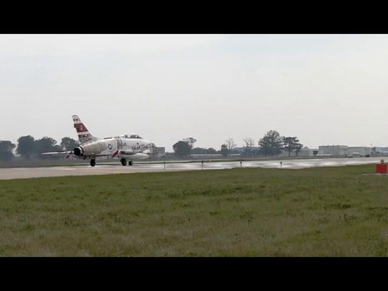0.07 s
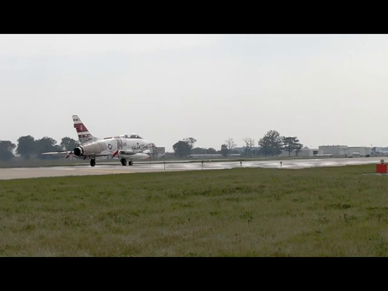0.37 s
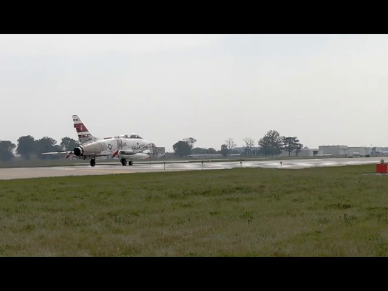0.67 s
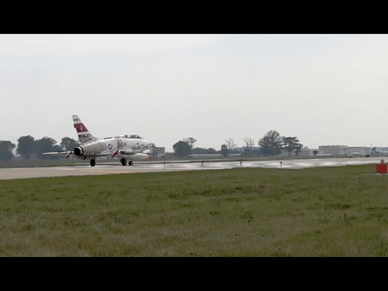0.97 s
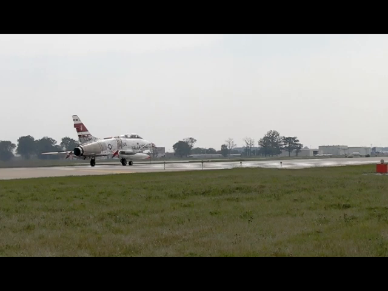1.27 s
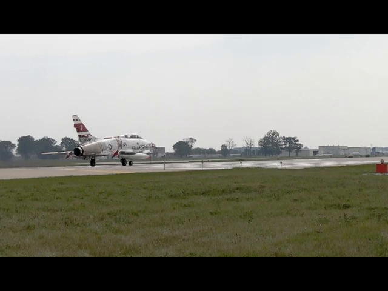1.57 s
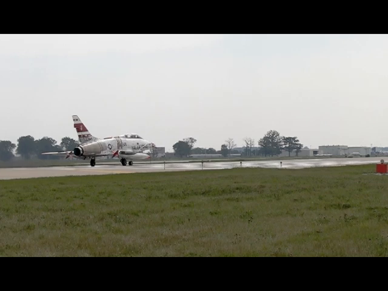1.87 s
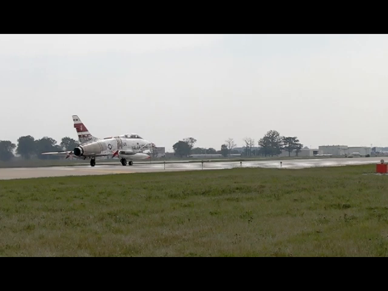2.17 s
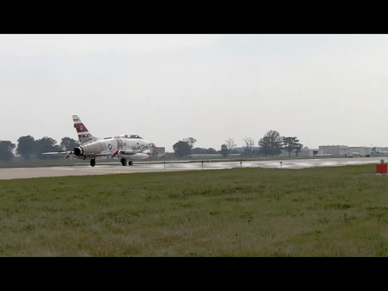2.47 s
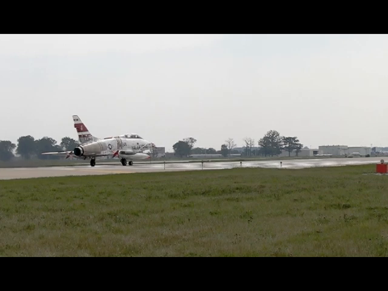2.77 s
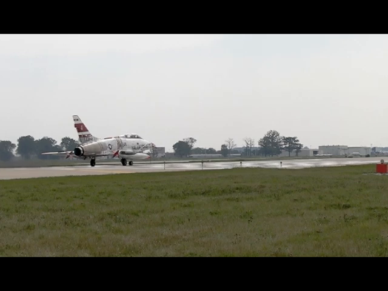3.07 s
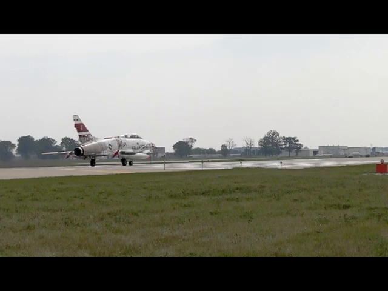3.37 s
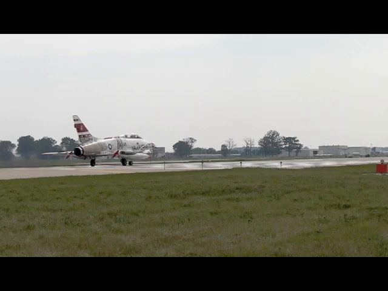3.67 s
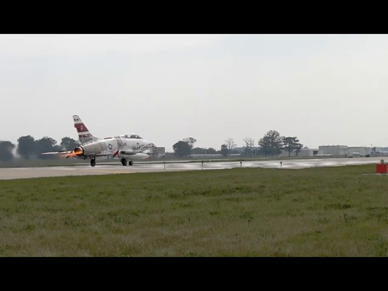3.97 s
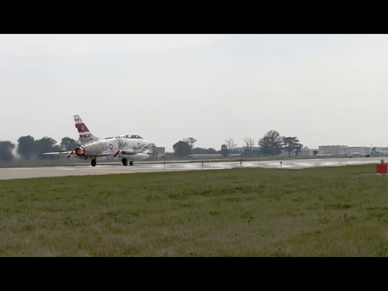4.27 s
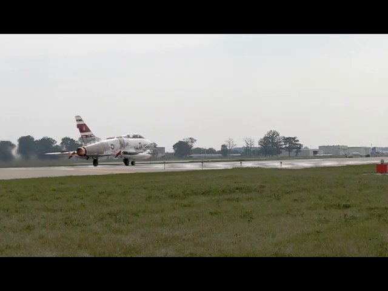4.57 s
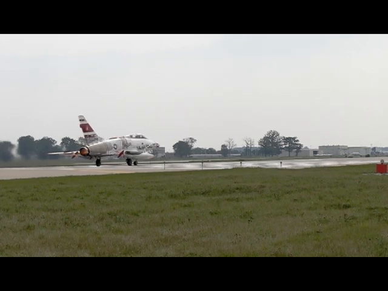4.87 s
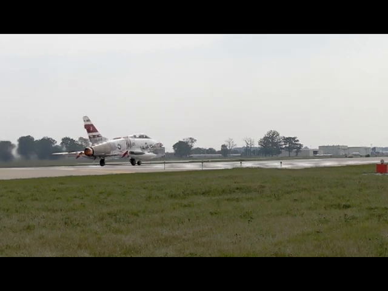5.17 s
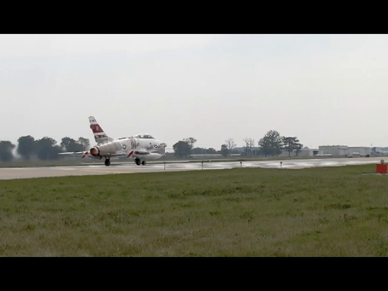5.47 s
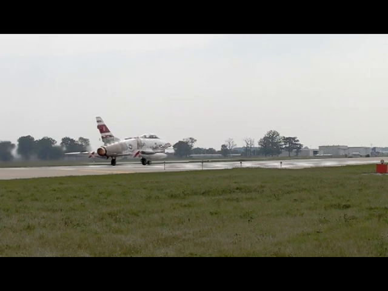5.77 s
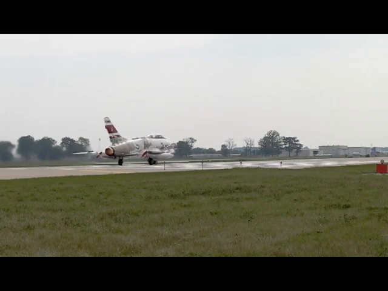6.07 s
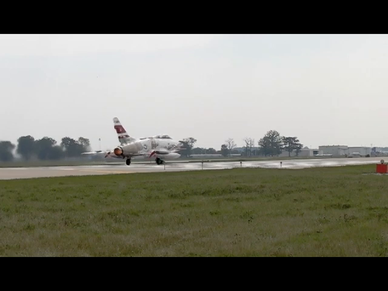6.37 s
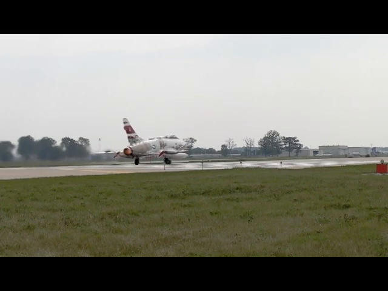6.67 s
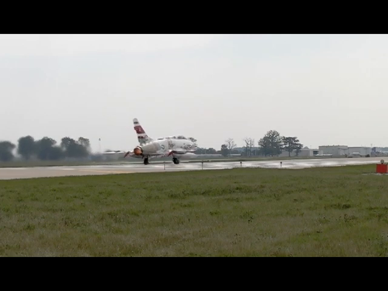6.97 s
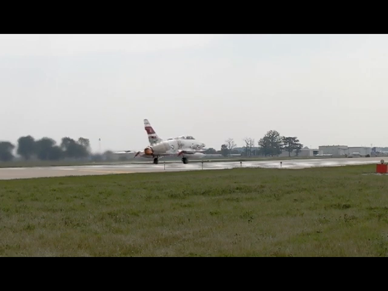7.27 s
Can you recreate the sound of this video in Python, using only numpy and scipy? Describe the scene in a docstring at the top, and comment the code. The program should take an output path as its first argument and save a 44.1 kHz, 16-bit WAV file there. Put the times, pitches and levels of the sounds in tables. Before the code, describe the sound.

Outdoors by a runway, the loud exhaust of a fighter jet rumbles, rasps and crackles in stereo. The rasp and crackle suddenly fall away, leaving a muffled rumble and a faint rush. A sharp, stuttering thud from the afterburner swamps the microphone for an instant, and the full roar is back at once. It carries on with scattered cracks and brief swells of turbine hiss, receding very slowly.

```python
"""On the grass beside a runway, a jet fighter at full power overloads a stereo microphone.
Big swirls in its exhaust rumble and roar, small ones rasp, shock waves crackle and the turbine hisses.
The nozzle opens, so the exhaust slows and the roar sinks to a dull rumble. Then the afterburner lights
with a triple thud, and the roar returns and slowly recedes as the aircraft starts to roll."""
import sys
import numpy as np
from scipy import signal
from scipy.fft import rfft, irfft, next_fast_len
from scipy.io import wavfile
from scipy.ndimage import uniform_filter1d

SR = 44100
rng = np.random.default_rng(int(sys.argv[2]) if len(sys.argv) > 2 else 0)


def wav_out(sig):
    """Save sig, one row per channel (or a flat mono array), as 16-bit PCM at SR to the path in sys.argv[1]."""
    wavfile.write(sys.argv[1], SR, np.round(np.clip(np.atleast_2d(sig).T, -1, 1) * 32767).astype(np.int16))


N = 332514
FFT_SIZE = next_fast_len(N, True)
TIME, HZ = np.arange(N) / SR, np.maximum(np.fft.rfftfreq(FFT_SIZE, 1 / SR), 1)
NOZZLE_OPENS_S, AFTERBURNER_S = 3.406, 4.118

# the strongest shock waves: (time [s], relative level [dB])
LOUD_CRACKS = [(0.281, -30), (0.3903, -15), (0.4667, -22.5), (0.5524, -25), (0.894, -25), (1.08, -17),
               (1.654, -20), (2.135, -26), (2.2082, -17), (3.322, -23), (4.1665, -16), (4.2085, -25),
               (4.647, -18), (4.751, -19), (5.0724, -15), (5.3948, -36), (5.5407, -27), (5.928, -17),
               (5.9922, -17), (6.229, -17), (6.4293, -19), (6.7257, -17), (6.795, -19), (6.969, -34),
               (7.4675, -24)]


def big_swirls(steepen_s=0.00018, squeeze=0.4, hold_s=0.017, ceiling=2.4):
    """Pressure from big swirls of exhaust: drops steepen on the way, and the largest swings are squashed."""
    # tone of the big swirls: (frequency [Hz], relative level [dB])
    spectrum = [(20, -10.5), (35, -27.5), (55, -11), (80, -7.5), (115, -2), (140, -1), (168, 0.5),
                (200, -2.5), (245, -7), (300, -6.5), (390, -9.5), (490, -18.5), (700, -12.5), (1200, -67)]
    wave = rms_one(apply_filter(rng.standard_normal((2, N)), tone(spectrum)))
    power = uniform_filter1d(wave[0] ** 2, int(hold_s * SR) + 1)
    wave = rms_one(wave / (power + 0.074) ** (squeeze / 2))
    wave = np.array([np.interp(TIME - steepen_s * w, TIME, w) for w in wave])
    return rms_one(ceiling * np.tanh(wave / ceiling))


def rumble_and_roar(pressure):
    """The deep part of the big swirls rumbles; the higher part roars."""
    deep = below(213.4)
    rumble = stereo(pressure, deep * (1 - below(20.5, order=2)))
    roar = stereo(pressure, (1 - deep) * below(490))
    return layer_gain("rumble") * rumble + layer_gain("roar") * roar


def shock_fronts(pressure, lead_s=0.0004, sputter=0.38, crack_size=2.8, crack_s=0.00098):
    """How deep the pressure plunges at each moment: shocks come in clusters and the strongest stand out."""
    smooth = apply_filter(pressure, below(420, order=4))
    plunge = -rms_one(np.interp(TIME + lead_s, TIME, smooth)) + sputter * drift(rate_hz=28)
    near_crack = np.minimum(sum(bump(s + crack_s, crack_s) for s, _ in LOUD_CRACKS), 1)
    return (1 - near_crack) * plunge + near_crack * crack_size


def rasp(plunge, flutter_db=0.5, echo_gain=0.16, echo_s=0.00283):
    """Small swirls rasp in bursts on the shocks; a close echo, shifted by the wind, ripples their tone."""
    # tone of the small swirls: (frequency [Hz], relative level [dB])
    spectrum = [(400, 11.5), (520, -4), (630, -3), (800, -9), (1050, -11.5), (1280, -11.5), (1650, -14.5),
                (2400, -21), (2800, -30.5), (3600, -35), (6000, -64)]
    noise = rng.standard_normal((2, N)) * from_db(flutter_db * drift(rate_hz=38))
    lag_s = echo_s * (1 + 0.031 * drift(rate_hz=3.5))
    gain = tone(spectrum) * (1 - below(481))
    low, out = below(917), 0
    for layer, burst_db, band in (("rasp", 2.5, low), ("tearing", 3.5, 1 - low)):
        bursts = noise * from_db(burst_db * plunge)
        echoed = [b - echo_gain * np.interp(TIME - lag_s, TIME, b) for b in bursts]
        out = out + layer_gain(layer) * stereo(echoed, gain * band)
    return out


def crackle(plunge, clicks_per_s=480, crowd_db=5, spread_db=6.0, click_db=-6.5, decay_s=0.0003):
    """Shocks crowd where the pressure plunges: uneven clicks, a sputtering fizz and a few loud cracks."""
    # tone of the shocks: (frequency [Hz], relative level [dB])
    spectrum = [(1500, -23), (3000, 7), (4200, -2), (5500, -3), (8000, -10.5), (12000, -14.5), (16000, -20)]
    level = layer_gain("crackle")
    hits = rng.random(N) < clicks_per_s / SR * rms_one(from_db(crowd_db * plunge))
    sizes = from_db(spread_db * np.clip(rng.standard_normal(N), -2, 2))
    clicks = level * from_db(click_db) * rms_one(hits * sizes)
    fizz = level * rms_one(from_db(3.0 * plunge + 3.5 * drift(rate_hz=160)))
    cracks = np.zeros(N)
    for s, level_db in LOUD_CRACKS:
        cracks[int(s * SR)] = from_db(level_db)
    cracks = signal.lfilter([1], [1, -np.exp(-1 / (decay_s * SR))], cracks + 1e-18)
    # each shock meets the two sides of the microphone in its own way
    click_pair = clicks * np.array([np.ones(N), rng.standard_normal(N)])
    pair = rng.standard_normal((2, N)) * np.hypot(fizz, cracks) - click_pair
    return np.sqrt(np.mean(level ** 2)) * stereo(pair, tone(spectrum) * (1 - below(2170)))


def layer_gain(layer):
    """A layer of exhaust sound falls as the nozzle opens, returns with the afterburner, then recedes."""
    # exhaust layers: name -> (level before the afterburner [dB], level with it [dB],
    # share of harshness [dB/dB], share of swell [dB/dB], fall as the nozzle opens [dB/s],
    # surge as the flame catches [dB], fade as the aircraft rolls away [dB/s])
    layers = {"rumble": (-13.5, -12.5, -0.06, 0, -9, 1.5, 0.5),
              "roar": (-15, -15, -0.0245, 0.19, 57, -1.5, 0.46),
              "rasp": (-23.5, -19.5, -0.09, 0, 85, 1, 0.3),
              "tearing": (-26.5, -27.6, 0.71, 0, 95, 5.5, 0.46),
              "crackle": (-42.5, -38, 0.59, 0.16, 74, 1.5, 1.47)}
    # how harsh the exhaust sounds: (time [s], treble compared with usual [dB])
    harshness = [(0.15, 0), (0.58, 6), (1.08, -3.5), (1.55, 4.5), (1.85, 1.7), (2.45, -7), (2.66, -3.5),
                 (2.95, -7.5), (3.3, -5.5), (4.55, -3.5), (5.0, 4.5), (5.55, 6.5), (5.98, -0.5), (6.7, 8.5),
                 (7.0, 4.3), (7.4, 13.5)]
    unlit_db, lit_db, harsh_share, swell_share, fall_rate, surge_db, fade_rate = layers[layer]
    unlit = unlit_db - fall_rate * np.maximum(TIME - NOZZLE_OPENS_S, 0)
    surge = surge_db * bump(AFTERBURNER_S + 0.078, width_s=0.044)
    lit = lit_db + surge - fade_rate * (TIME - AFTERBURNER_S)
    thrust_db = np.where(TIME < AFTERBURNER_S, unlit, lit)
    harsh_db = np.interp(TIME, *np.transpose(harshness))
    return from_db(thrust_db + harsh_share * harsh_db + swell_share * swell_db())


def afterburner_thuds(hold_s=0.00089, decay_s=0.00063, right_lag_s=0.00112, snap_s=0.000067):
    """Blast waves swamp the microphone: flat-topped thuds that sag away, a little later on the right."""
    # blasts as the flame catches: (time [s], push or pull [relative], snap on top [relative])
    blasts = [(4.1101, .95, .1), (4.1184, -.9, .75), (4.1264, .5, 0)]
    thuds, snaps = np.zeros((2, N)), np.zeros(N)
    for s, push, snap in blasts:
        age = TIME - s - np.array([[0], [right_lag_s]])
        thuds += push * (age > 0) * np.exp(-np.maximum(age - hold_s, 0) / decay_s)
        snaps += snap * (age[1] > 0) * np.exp(-np.abs(age[1]) / snap_s)
    thuds = signal.sosfilt(signal.butter(1, 900, fs=SR, output="sos"), thuds + 1e-18)
    snaps = signal.sosfilt(signal.butter(2, 4600, fs=SR, output="sos"), snaps + 1e-18)
    return thuds + snaps


def slow_exhaust(rumble_db, rush_db, rumble_width=0.7, rush_width=0.74):
    """With the nozzle open the exhaust is slow: a smooth rumble and a faint rush, with no shocks."""
    # tone of the slow exhaust: (frequency [Hz], relative level [dB])
    spectrum = [(20, -25), (60, -6.5), (130, 2), (180, -5), (250, -11.5), (400, -17), (540, -26.5),
                (800, -30.5), (1100, -41), (1300, -35.5), (1700, -36), (2500, -46), (4000, -68),
                (15000, -81)]
    noise = rng.standard_normal((2, N))
    low, out = below(780), 0
    for level_db, width, band in ((rumble_db, rumble_width, low), (rush_db, rush_width, 1 - low)):
        part = from_db(level_db) * stereo(noise, tone(spectrum) * band)
        out = out + width * part + (1 - width) * part.mean(axis=0)   # draw it toward the centre
    return out


def turbine(hiss_db):
    """A smooth hiss from the engine itself."""
    # tone of the turbine: (frequency [Hz], relative level [dB])
    spectrum = [(2000, -25.5), (2900, 0), (3400, 0), (4000, -7.5), (4700, -17), (8000, -47), (10500, -33),
                (16000, -45)]
    return from_db(hiss_db) * stereo(rng.standard_normal((2, N)), tone(spectrum))


def swell_db():
    """The hiss swells a few times, and the roar and crackle rise a little with it."""
    # swells of the turbine hiss: (time [s], half length [s], rise [dB])
    swells = [(0.2, 0.16, 5), (3.28, 0.11, 6.5), (4.718, 0.039, 10.5), (6.52, 0.2, 7.5), (7.37, 0.056, 11)]
    return sum(rise_db * bump(s, width_s) for s, width_s, rise_db in swells)


def stereo(pair, gain):
    """Filter two unrelated sounds into left and right: alike in the bass, opposed in the treble."""
    # left-right difference against the sum: (frequency [Hz], level [dB], likeness [0-1], phase [rad])
    microphone_sides = [(35, -5.5, 0.86, -4.03), (100, -12.7, 0.96, -4.54), (240, -17.2, 0.61, -4.51),
                        (500, -8.1, 0.47, -4.45), (900, -6.2, 0.28, -4.25), (1400, -3.8, 0.26, -4.35),
                        (2200, -0.4, 0.61, -3.09), (3400, 7.3, 0.67, -3.8), (6000, 8.8, 0.45, -3.38),
                        (14000, 7.1, 0.17, -3.04)]
    side_db, alike, phase = over_hz(microphone_sides)
    alike = np.clip(alike, 0, 1)
    shared, own = rfft(pair, FFT_SIZE) * gain
    difference = from_db(side_db) * (shared * alike * np.exp(1j * phase) + own * np.sqrt(1 - alike ** 2))
    mid, side = irfft(np.array([shared, difference]), FFT_SIZE)[:, :N]
    return np.array([mid + side, mid - side]) / np.std(mid)


def from_db(db):
    """Turn decibels into a gain to multiply by."""
    return np.exp(np.asarray(db) * (np.log(10) / 20))


def rms_one(x):
    """Scale a signal so its typical size (rms) is 1."""
    return x / np.sqrt(np.mean(x ** 2) + 1e-20)


def over_hz(rows):
    """Fill in each column of a table for every frequency, on a log scale."""
    hz, *columns = np.transpose(rows)
    return [np.interp(np.log(HZ), np.log(hz), c) for c in columns]


def tone(spectrum):
    """A gain for each frequency, from a table in dB."""
    return from_db(over_hz(spectrum)[0])


def below(edge_hz, order=8):
    """Gains that keep what is below the edge; one minus them keeps what is above."""
    return 1 / (1 + (HZ / edge_hz) ** order)


def apply_filter(x, gain):
    """Turn each frequency up or down by its gain."""
    return irfft(rfft(x, FFT_SIZE) * gain, FFT_SIZE)[..., :N]


def drift(rate_hz):
    """A smooth random wobble of typical size 1."""
    return rms_one(apply_filter(rng.standard_normal(N), below(rate_hz, order=2)))


def bump(s, width_s):
    """A smooth rise to 1 and back around a moment."""
    out = np.zeros(N)
    near = slice(*np.searchsorted(TIME, [s - 4 * width_s, s + 4 * width_s]))
    out[near] = np.exp(-((TIME[near] - s) / width_s) ** 2)
    return out


def ramp(start_s, length_s):
    """A straight rise from 0 to 1."""
    return np.clip((TIME - start_s) / length_s, 0, 1)


def scene(start_s=0.039, swamped_s=(4.106, 4.131)):
    """One pressure wave drives roar, rasp and crackle; the open nozzle stills them until the thuds."""
    pressure = big_swirls()
    plunge = shock_fronts(pressure[0])
    full_power = rumble_and_roar(pressure) + rasp(plunge) + crackle(plunge)
    full_power += turbine(hiss_db=-47 + swell_db())
    sag = 1 - ramp(start_s=3.705, length_s=0.22)   # in the lull, rush and hiss start low, then recover
    lull = slow_exhaust(rumble_db=-18.5, rush_db=-43.5 - 5 * sag) + turbine(hiss_db=-51.5 - 9 * sag)
    opened = ramp(NOZZLE_OPENS_S + 0.08, length_s=0.14) * (TIME < AFTERBURNER_S)
    jet = np.sqrt(1 - opened) * full_power + np.sqrt(opened) * lull
    # the blasts blot out the jet for a moment
    heard = (TIME > start_s) & ((TIME < swamped_s[0]) | (TIME > swamped_s[1]))
    return jet * uniform_filter1d(heard * 1., size=64) + afterburner_thuds()


def record(dry, cutoff_hz=15800):
    """The microphone dulls two narrow bands, clips the loudest peaks and cuts the highest treble."""
    # narrow dips of the microphone: (frequency [Hz], width [Hz], level at the bottom [dB])
    dips = [(2877, 616, -20), (4980, 140, -10)]
    for hz, width_hz, bottom_db in dips:
        leak = from_db(bottom_db)
        notched = signal.lfilter(*signal.iirnotch(hz, hz / width_hz, fs=SR), dry)
        dry = (1 - leak) * notched + leak * dry
    return apply_filter(np.clip(dry, -1, 1), below(cutoff_hz, order=300))


dry = scene()
out = record(dry)
wav_out(out)
```